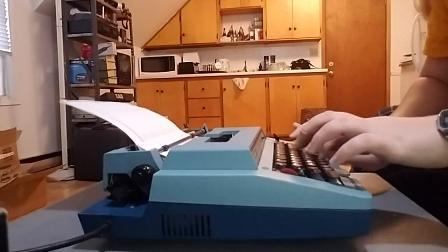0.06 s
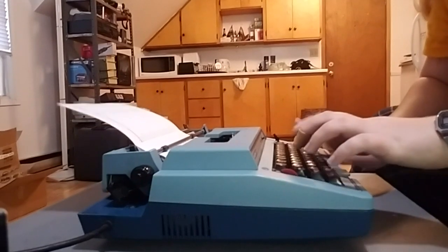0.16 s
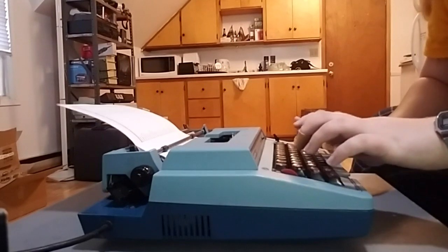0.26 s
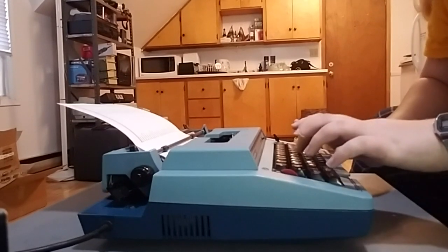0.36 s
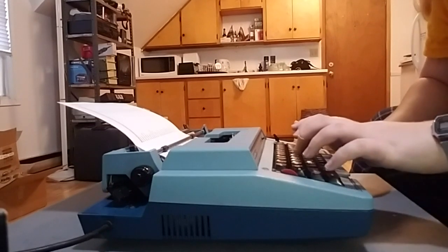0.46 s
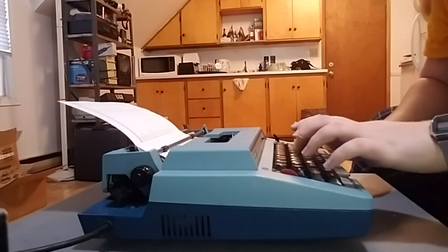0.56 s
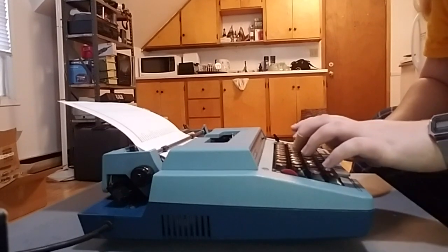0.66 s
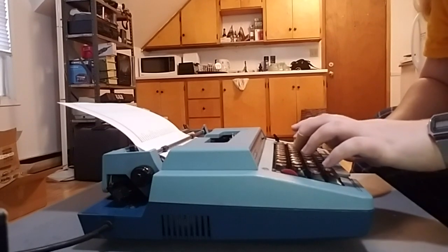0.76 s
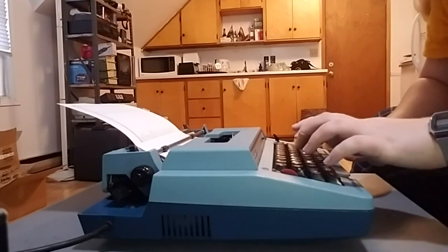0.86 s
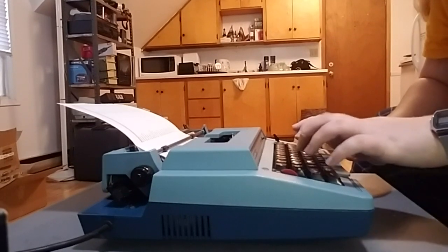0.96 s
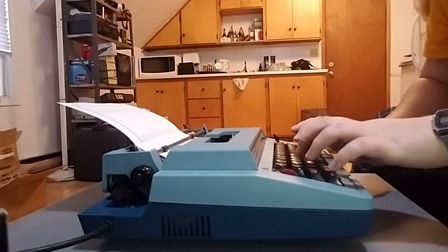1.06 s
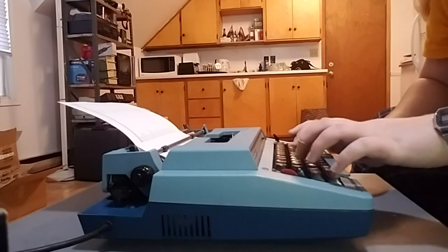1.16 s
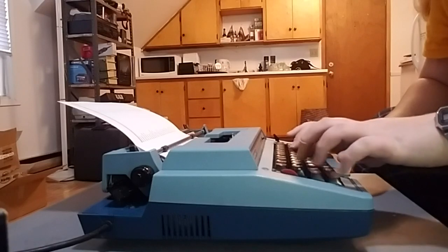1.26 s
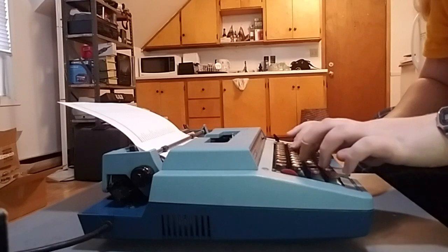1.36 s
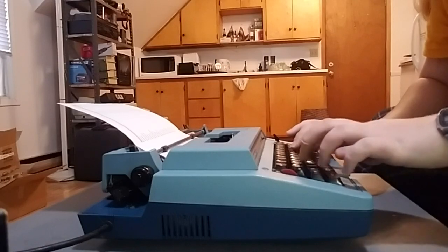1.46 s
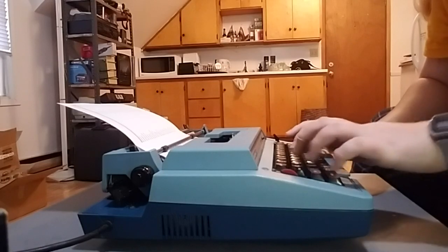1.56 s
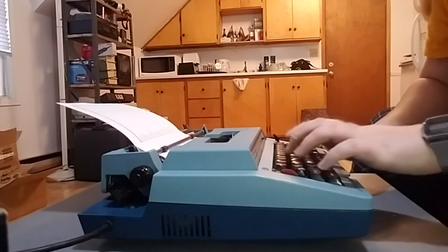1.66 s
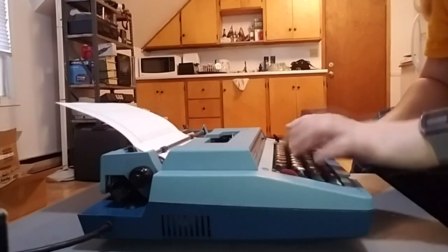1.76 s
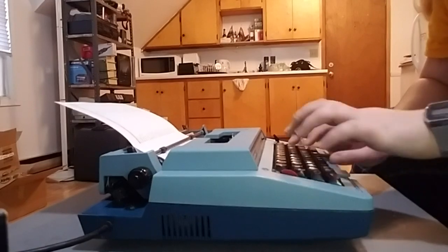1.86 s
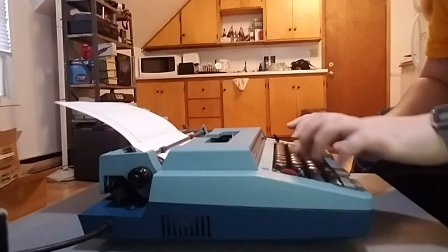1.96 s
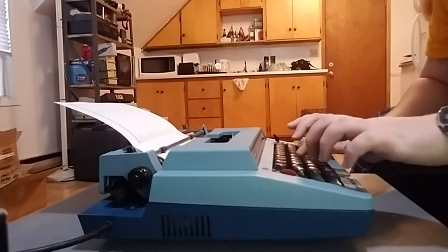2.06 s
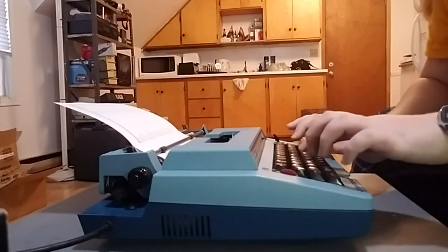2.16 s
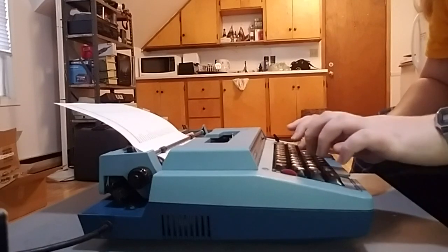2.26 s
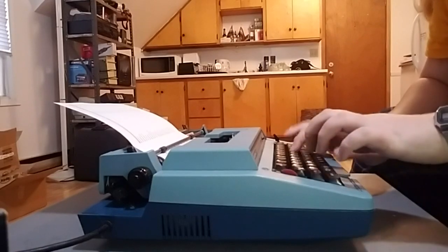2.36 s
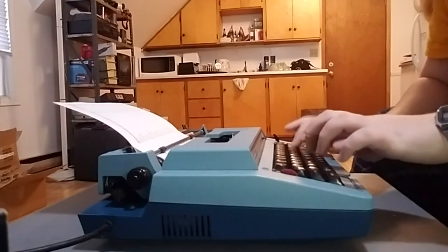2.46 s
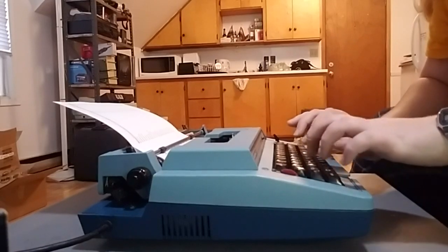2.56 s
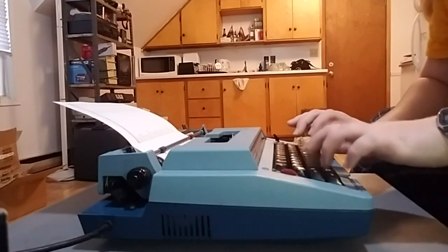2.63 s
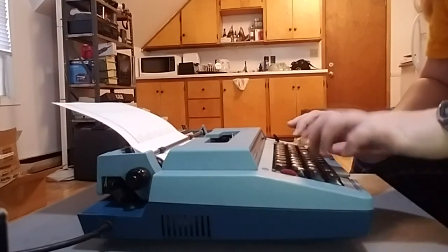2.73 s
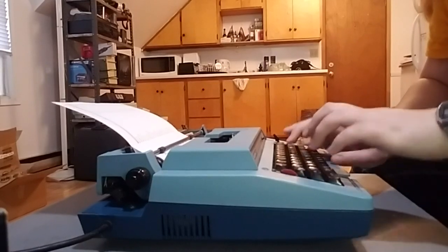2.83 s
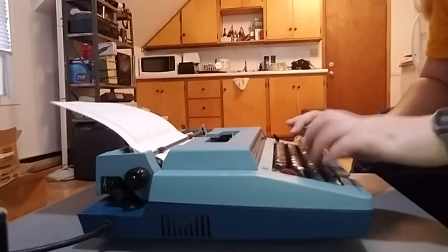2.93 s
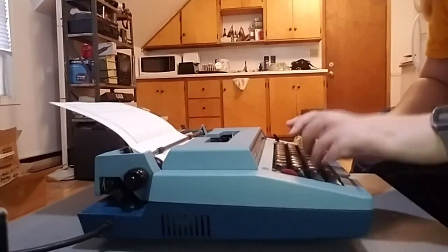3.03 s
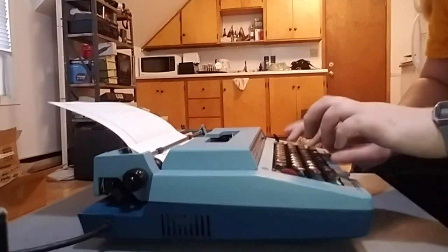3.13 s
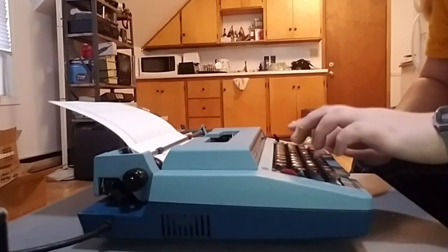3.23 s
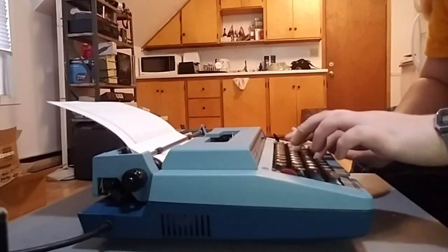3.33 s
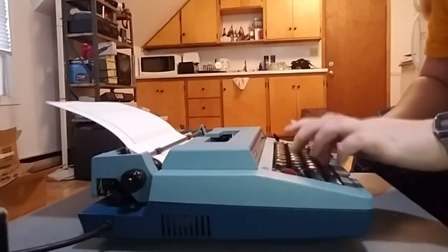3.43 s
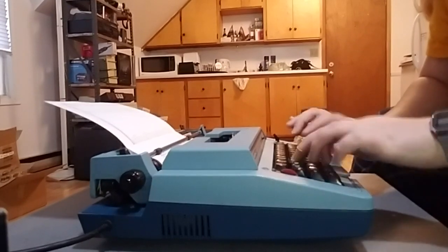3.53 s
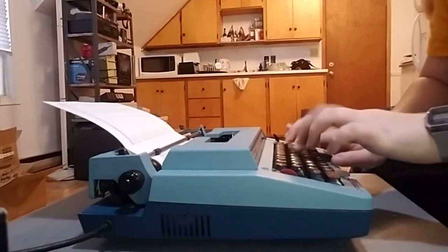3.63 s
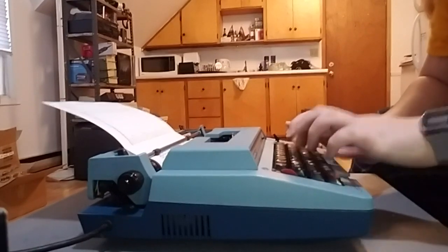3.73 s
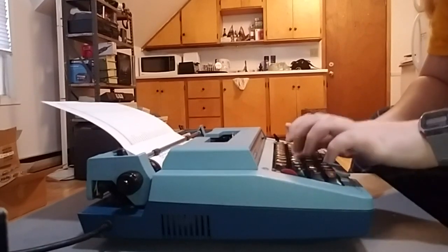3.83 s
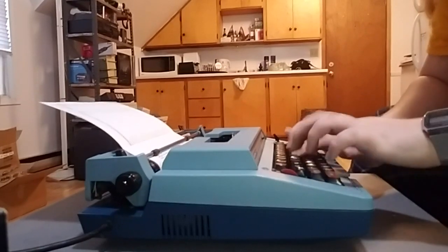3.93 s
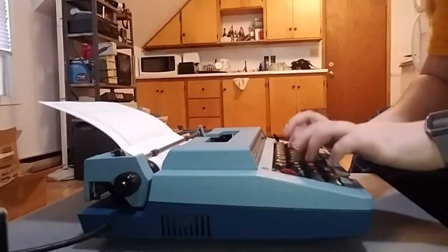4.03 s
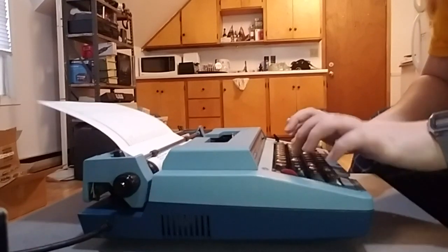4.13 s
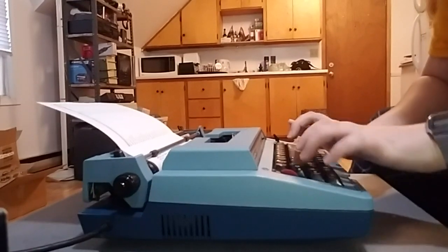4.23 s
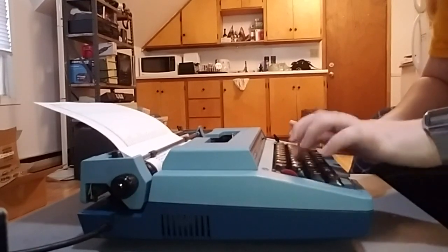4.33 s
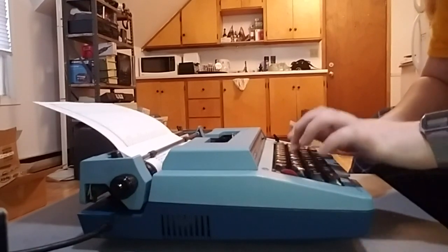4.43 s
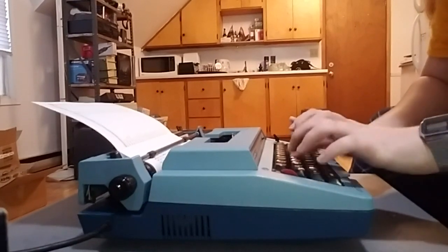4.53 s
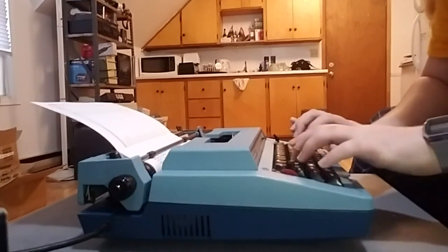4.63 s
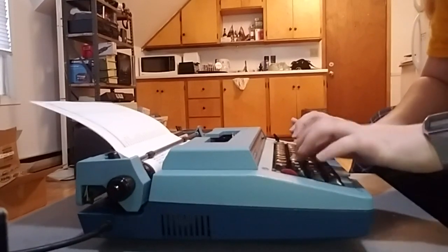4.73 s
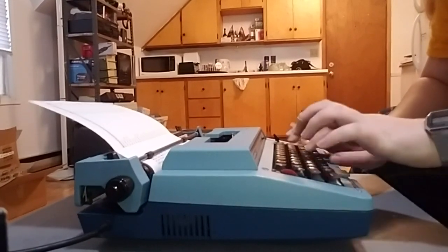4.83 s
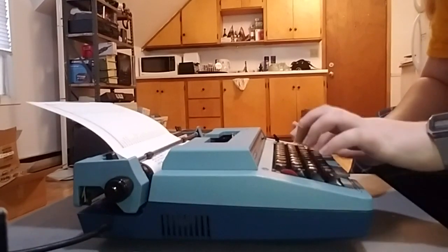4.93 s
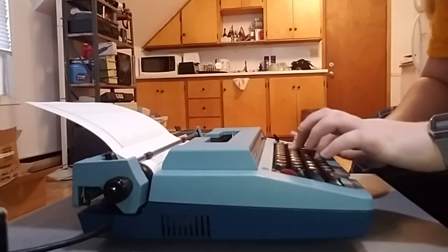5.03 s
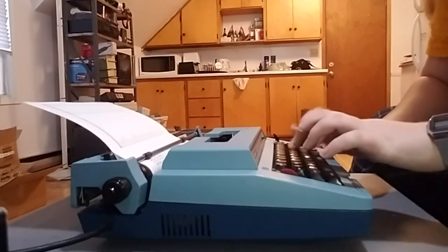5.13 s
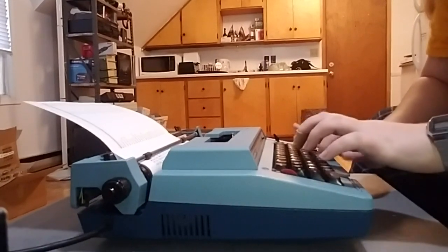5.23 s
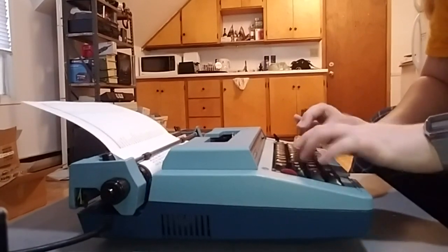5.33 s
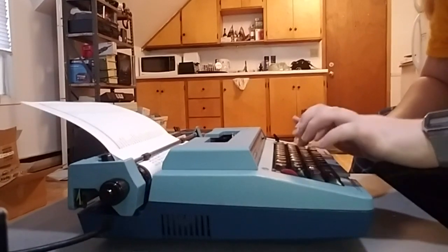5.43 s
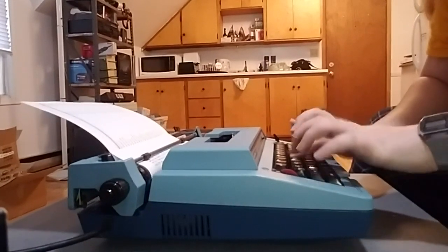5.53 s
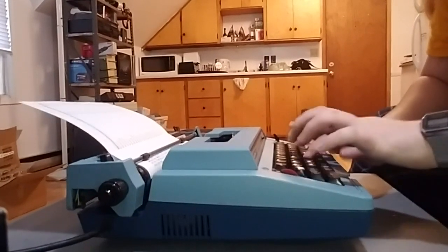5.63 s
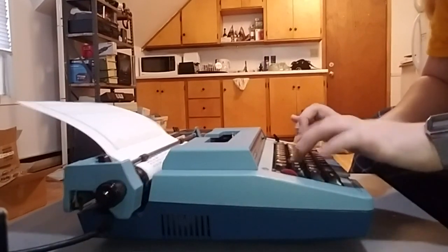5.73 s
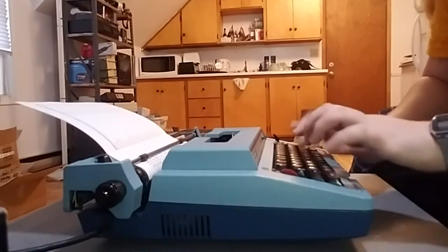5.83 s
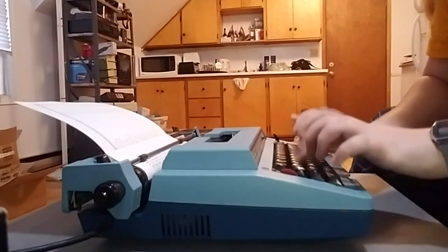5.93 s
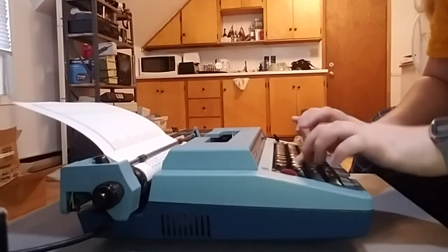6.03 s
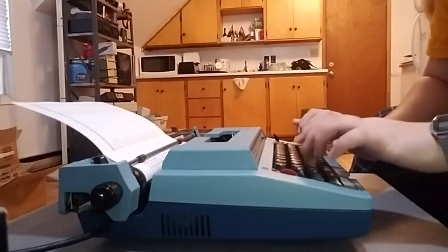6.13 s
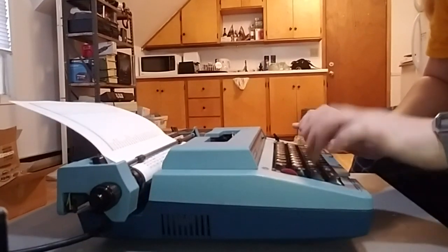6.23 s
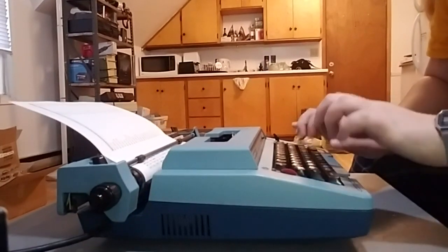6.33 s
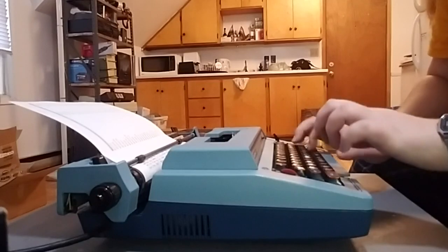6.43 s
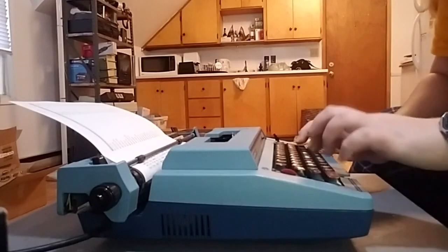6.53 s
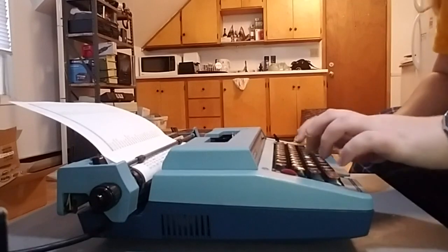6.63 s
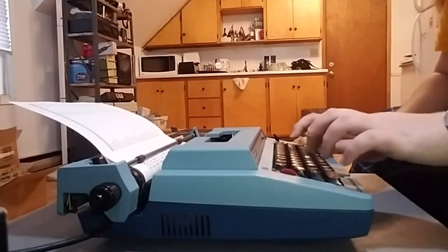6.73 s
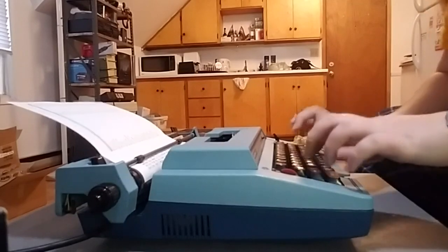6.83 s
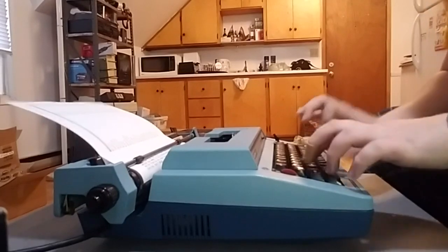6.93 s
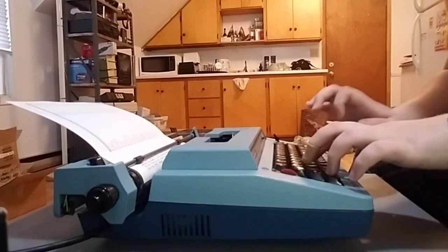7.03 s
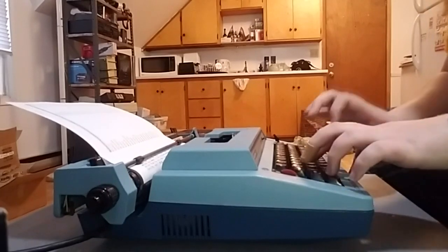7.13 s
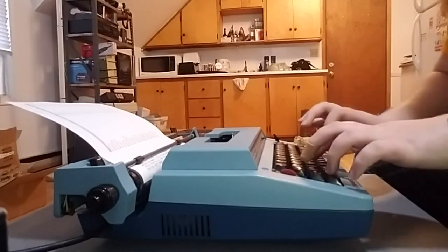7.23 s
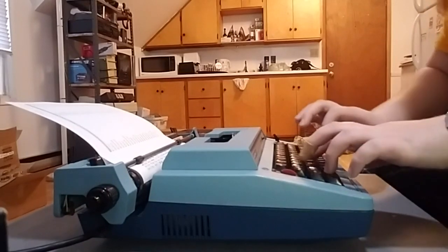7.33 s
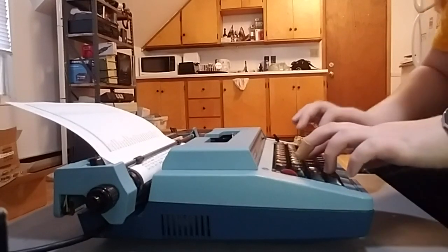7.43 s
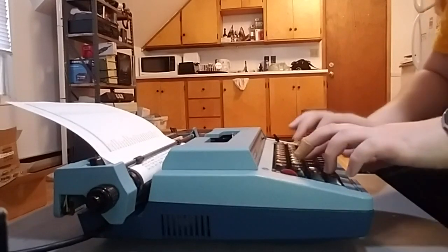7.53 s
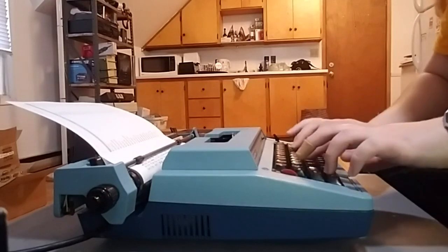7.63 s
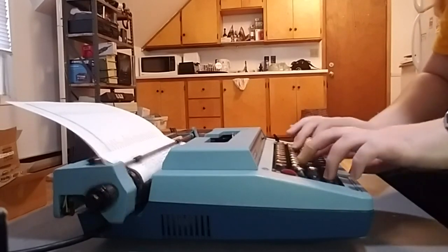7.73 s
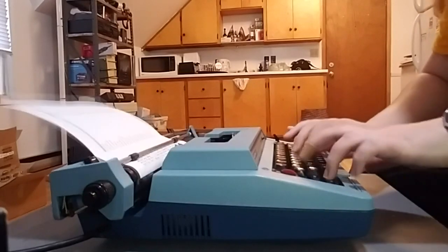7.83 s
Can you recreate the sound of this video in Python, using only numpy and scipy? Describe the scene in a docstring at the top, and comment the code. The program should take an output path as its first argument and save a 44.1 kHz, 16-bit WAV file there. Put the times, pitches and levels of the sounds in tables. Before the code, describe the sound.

An electric typewriter is heard close up in stereo in a small, lively kitchen, its motor giving a steady low hum and soft throbbing whir throughout. A key slaps at 0 s, followed at once by a softer space-bar knock, then only motor until two quick strikes near 1.6 s and a space at 1.75. Single strikes come at 2.3, 2.6 and 2.9 s. From 3.2 to 6.1 s typing is rapid and uneven, roughly seven or eight strikes a second, each a bright steel tick, hard slap, carriage clack and hollow thud with tiny rattles. Brief gaps and duller space knocks break the run. After a pause, a faint ratchety slide and softer strike come around 6.7 s, a space at 6.8, and a muffled low bump at 6.9. Light shift knocks at 7.6 to 7.7 precede a last strike at 7.8. Faint hiss occasionally swells.

```python
"""Electric typewriter in a kitchen

Someone types in quick bursts on an electric typewriter, close to a stereo microphone. Each key trips a linkage
with a bright tick; the type bar slaps the platen and rebounds; the carriage steps on with a clack and the case
thuds. These blows are bursts of dense, fading resonances, and a room tail rings after them. Steady tones and
shaped noise make the motor's hum and whir; a faint band of hiss comes and goes."""
import sys
import numpy as np
from scipy import signal
from scipy.fft import irfft, next_fast_len
from scipy.io import wavfile

SR = 44100
rng = np.random.default_rng(int(sys.argv[2]) if len(sys.argv) > 2 else 0)


def master_out(mix):
    """Clip the mix to full scale and print it as 16-bit PCM to the path in sys.argv[1]."""
    frames = np.transpose(np.atleast_2d(mix))
    ceiling = np.clip(frames, -1, 1)
    pcm = np.round(ceiling * 32767).astype(np.int16)
    wavfile.write(sys.argv[1], SR, pcm)


N = 347949
BAND_HZ = np.geomspace(100, 12800, 8)  # octave centres

# Colour of the bright steel ticks. Each row: frequency in Hz, relative level in dB per Hz.
TICK_COLOUR = [(30, -34.5), (150, -18.5), (500, -12), (1200, -11), (2500, -13.5), (4300, -5), (5000, -11),
               (7500, -9.5), (9300, 4.5), (10700, -3.5), (12500, 3), (16000, -13.5)]
# Colour of the carriage clacks. Each row: frequency in Hz, relative level in dB per Hz.
CLACK_COLOUR = [(30, -27), (120, -17), (400, -3.5), (900, -2.5), (1600, -2), (2200, -5), (4000, -10.5),
                (5000, -23), (10000, -19), (16000, -22.5)]
# Knocks of the shift lifting the type basket. Each row: start in seconds, relative level in dB,
# brightness in dB per octave.
KNOCKS = [(7.6234, -21.5, 3.5), (7.631, -19, -0.5), (7.71, -23.5, -1.5), (7.7207, -21, 4)]


def gain_of(db):
    """Turns decibels into amplitude."""
    return 10 ** (np.asarray(db) / 20)


def evened(x):
    """Scales to an rms (average strength) of 1."""
    return x / np.sqrt(np.mean(x ** 2) + 1e-20)


def read(points, hz):
    """Joins points by straight lines on a log-frequency axis."""
    f, value = np.transpose(points)
    return np.interp(np.log(hz + 1), np.log(f + 1), value)


def add(mix, s, sound):
    """Adds a stereo sound to the mix at time s, cutting off what falls outside."""
    start = round(s * SR)
    sound = sound[:, max(-start, 0):]
    part = mix[:, max(start, 0):][:, :sound.shape[1]]
    part += sound[:, :part.shape[1]]


def case_db(hz):
    """Peaks and dips in dB where the machine's case and frame resonate."""
    # Resonances of the body. Each row: frequency in Hz, width in Hz, height in dB.
    resonances = [(379.5, 48, 4), (502.6, 59, 8.5), (603, 41, -10.5), (730, 38, 4.5), (800, 61, 3),
                  (977, 41, 3), (1108, 100, -4.5), (1336, 30.6, 7.5), (1413, 112, 1), (2050, 280, 1.5),
                  (2690, 59, 2), (3370, 49, 5), (3777, 136, 5), (4300, 37, 8), (6700, 102, 2),
                  (6930, 77, 8), (8900, 327, 2)]
    return sum(db / (1 + (2 * (hz - f) / width) ** 2) for f, width, db in resonances)


def port_pair(hz):
    """Random-phase spectra at two microphone ports: partly alike in the bass, unrelated in the treble."""
    # Likeness of the two channels. Each row: frequency in Hz, coherence from 0 to 1.
    likeness = [(30, 0.4), (130, 0.86), (330, 0.54), (480, 1), (610, 0.45), (750, 0.97), (1000, 0.53),
                (1400, 0.56), (1800, 0.33), (2300, 0), (4000, 0)]
    # How far the left channel leads. Each row: frequency in Hz, phase in radians.
    left_lead = [(30, 0.33), (250, 0.146), (550, 0.71), (950, 0.31), (1150, 1.77), (1600, 3), (2200, 1.06),
                 (5000, 0.98)]
    a, b = np.exp(2j * np.pi * rng.random((2, len(hz))))
    same = read(likeness, hz)
    right = (same * a + np.sqrt(1 - same ** 2) * b) * np.exp(-1j * read(left_lead, hz))
    return np.array([a, right])


def lean(hz):
    """Left and right gains for the machine's place."""
    # Balance of the two sides. Each row: frequency in Hz, left minus right in dB.
    balance = [(60, -6), (110, 1), (200, -3.5), (380, 0), (700, -1), (1290, -2.5), (2380, 1.5), (4400, 1),
               (8000, 0.6), (15000, 2.5)]
    return gain_of(np.outer([.5, -.5], read(balance, hz)))


def octaves(hz):
    """Overlapping octave windows that sum to one."""
    return np.array([read(np.c_[BAND_HZ, row], hz) for row in np.eye(len(BAND_HZ))])


def wander(per_s):
    """Random drift of rms 1, made of sines up to per_s cycles a second."""
    t = np.arange(0, N + 512, 512) / SR
    rates = np.geomspace(per_s / 10, per_s, 20)
    drift = sum(np.sin(2 * np.pi * (f * t + rng.random())) / np.sqrt(f) for f in rates)
    return np.interp(np.arange(N) / SR, t, evened(drift))


def motor(shaft_hz=56.8, throb=0.17, waver=0.00088, body=0.33, hum_lean_db=-1.5):
    """Steady hum tones, and the whir of belt and roll that throbs with the shaft and rings in the case."""
    # Mains hum and motor tones. Each row: frequency in Hz, level in dB before the stereo tilt.
    hum_tones = [(58.8, -74.5), (119.95, -54), (179.5, -75.5), (239.9, -76.5), (307, -70.5), (359.5, -77),
                 (421.8, -70.5), (475, -68.5), (773, -69.5), (1167, -77.5), (1228, -72.5), (1287.5, -82.5),
                 (1405, -80), (1600, -77)]
    # Colour of the whir of motor, belt and power roll. Each row: frequency in Hz, relative level in dB per Hz.
    whir_colour = [(20, -3), (40, -3.5), (75, -10), (130, -5), (200, -3.5), (330, -3), (500, 2),
                   (650, -1.5), (800, -1.5), (1100, -4), (2300, -9.5), (2900, -15), (3900, -18.5),
                   (4900, -27), (8000, -31.5), (16000, -23)]
    # Level of the whir as typing loads it, before its flutter. Each row: time in seconds, level in dB.
    whir_level = [(0, -54), (1.4, -57), (2.1, -53.5), (6.5, -55), (7.1, -54), (7.9, -58.5)]
    t, hz = np.arange(N) / SR, np.fft.rfftfreq(next_fast_len(N), 1 / SR)
    drift = waver * wander(6)
    hum = 0
    for f, db in hum_tones:
        phase = f * (2 * np.pi * t + drift) + 2 * np.pi * rng.random()
        hum = hum + gain_of(db) * np.sqrt(2) * np.sin(phase)
    colour = gain_of(read(whir_colour, hz) + body * case_db(hz))
    whir = evened(irfft(port_pair(hz) * lean(hz) * colour)[:, :N])
    flutter_db = 0.71 * wander(24)
    whir *= gain_of(np.interp(t, *np.transpose(whir_level)) + flutter_db)
    whir *= 1 + throb * np.sin(2 * np.pi * shaft_hz * t)
    return whir + hum * gain_of([[hum_lean_db], [-hum_lean_db]])


def hiss(centre_hz=3700, width_hz=330):
    """A narrow band of noise that swells and fades."""
    # Level of the faint, airy hiss. Each row: time in seconds, level in dB.
    hiss_level = [(0, -70), (0.35, -66), (0.8, -88), (1.5, -84), (2.1, -67), (2.5, -78), (6.5, -88),
                  (6.9, -71), (7.15, -72), (7.4, -88)]
    hz = np.fft.rfftfreq(next_fast_len(N), 1 / SR)
    window = np.exp(-.5 * ((hz - centre_hz) / width_hz) ** 2)
    band = evened(irfft(port_pair(hz) * window)[:, :N])
    return band * gain_of(np.interp(np.arange(N) / SR, *np.transpose(hiss_level)))


def typing(step_s=.054):
    """The main moments of the machine's cycle, as rows: seconds, relative dB, brightness in dB per octave."""
    # Letter keys. Each row: strike in seconds, strike level in dB, strike brightness in dB per octave,
    # seconds from trip to strike, trip level in dB, trip brightness in dB per octave, carriage stop level
    # in dB. All levels are relative.
    keys = [(0.0014, -13.5, -1, 0.028, -6, -7.5, -26), (1.5665, -9.5, 0, 0.034, -19.5, -5, -15),
            (1.6774, -9.5, 0, 0.032, -17.5, -1.5, -12.5), (2.3238, -8, 0, 0.029, -10.5, -2, -21),
            (2.6074, -8.5, 0, 0.039, -15, -3.5, -19), (2.9249, -7.5, -1, 0.029, -17, -5, -15.5),
            (3.2177, -7.5, 0.5, 0.034, -16.5, -1.5, -12.5), (3.2939, -8.5, -0.5, 0.042, -19, -9.5, -21),
            (3.392, -9, 0, 0.018, -25, 2, -13), (3.468, -9, 0.5, 0.034, -12.5, -4, -15),
            (3.7347, -8, 0.5, .0317, -13, -3.5, -14.5), (3.8086, -6.5, 1, 0.029, -29, -8.5, -19.5),
            (3.9103, -7.5, 1.5, 0.04, -16, -3.5, -16), (3.9605, -9, -0.5, .035, -24, -10, -16),
            (4.1807, -7.5, 0.5, 0.059, -14, -4.5, -12.5), (4.2177, -9.5, -0.5, 0.04, -14, -2, -21.5),
            (4.355, -8, 0, 0.055, -9, -4, -13.5), (4.4516, -8, 0.5, 0.044, -16, -3.5, -12.5),
            (4.589, -8, 0, 0.039, -9, 0, -11), (4.6623, -8, 0.5, .0388, -6, 3.5, -17),
            (4.9424, -7.5, 1, 0.045, -22, 2, -29.5), (4.996, -9.5, 0, 0.029, -23, -2.5, -17),
            (5.1647, -6, 1, .0339, -14.5, 1, -16.5), (5.2664, -9.5, 0, .0285, -6.5, 1.5, -16),
            (5.4855, -10, 0.5, 0.029, -13, -3.5, -13.5), (5.572, -7.5, 1, 0.042, -12, -5.5, -18.5),
            (5.6488, -8.5, 0, 0.036, -8, -5, -13), (5.8328, -10, 0, 0.052, -14, -5.5, -12.5),
            (5.9312, -9.5, 0.5, 0.05, -9, 0, -15), (6.007, -8, 1, 0.04, -15, 4, -12),
            (6.13, -9.5, 0.5, 0.038, -21.5, -5, -14.5), (6.7151, -12, -1.5, 0.038, -35, -8.5, -19.5),
            (7.7929, -9.5, 1, .0454, -12, -1, -14)]
    # Space bar. Each row: start in seconds, relative level in dB, seconds until the carriage stops,
    # relative level of that stop in dB.
    space_bar = [(0.067, -19.5, .035, -27), (1.7496, -19, .069, -16.5), (2.749, -16.5, .056, -18),
                 (3.01, -16, 0.065, -17), (3.556, -17.5, 0.055, -17.5), (4.766, -19.5, 0.052, -15),
                 (6.797, -20.5, .066, -19.5)]
    trips = [(s - lead, db, brightness) for s, _, _, lead, db, brightness, _ in keys]
    strikes = [key[:3] for key in keys]
    spaces = [(s, db, 0) for s, db, _, _ in space_bar]
    # after a strike, the carriage stops one letter on
    stops = [(s + step_s, db, 0) for s, *_, db in keys]
    stops += [(s + step, db, 0) for s, _, step, db in space_bar]
    return trips, strikes, spaces, stops


def after(causes, delay_s, db, brightness, play_s=0):
    """The blows that a list of causes sets off (before it if the delay is negative); play_s varies the delay."""
    rows = np.array(causes) + [delay_s, db, brightness]
    rows[:, 0] += play_s * rng.standard_normal(len(rows))
    return rows


def ringer(colour, bass_t60, treble_t60, rise_cycles, alike, patchy_db=2, size=4096, count=60):
    """Returns a striker for one part: dense resonances; the t60s are the seconds to fall by 60 dB."""
    hz, t = np.fft.rfftfreq(size, 1 / SR), np.arange(size) / SR
    t60 = np.geomspace(bass_t60, treble_t60, len(BAND_HZ))[:, None]
    rise = np.minimum(rise_cycles / BAND_HZ, .003)[:, None] + 0.00079  # the bass swells more slowly
    fade = (1 - np.exp(-t / rise)) * gain_of(-60 * t / t60)
    fade /= np.sqrt(np.mean(fade ** 2, 1, keepdims=True))
    shape = evened(gain_of(read(colour, hz) + case_db(hz))) * lean(hz)
    bands, own = octaves(hz)[:, None], port_pair(hz)
    centre_hz = np.exp(np.average(np.log(hz + 1), weights=shape[0] ** 2))
    height = np.log2(np.clip(hz, 150, None) / centre_hz)  # octaves above the part's centre
    height = np.clip(height, -3, 3)

    def strike(db, brightness):
        """One blow: partly the part's own ring, partly new; each contact favours other resonances."""
        place = np.linspace(0, 1, count)
        favoured = np.interp(np.sqrt(hz / hz[-1]), place, rng.standard_normal(count))
        spectrum = (np.sqrt(alike) * own + np.sqrt(1 - alike) * port_pair(hz)) * shape
        spectrum *= gain_of(brightness * height) * evened(gain_of(patchy_db * favoured))
        return gain_of(db) * np.sqrt(size) * (irfft(bands * spectrum) * fade[:, None]).sum(0)
    return strike


def blows(rows, strike, level_db):
    """Plays a table of blows on one part."""
    out = np.zeros((2, N))
    for s, db, brightness in rows:
        add(out, s, strike(db + level_db, brightness))
    return out


def levers(trips, level_db=-15, size=4096):
    """Every linkage pings as it trips; pitch and the balance of the tones differ from ping to ping."""
    # A steel key lever ringing. Each row: typical frequency in Hz, relative level in dB,
    # seconds to fall by 60 dB.
    lever_tones = [(4140, -9, 0.024), (4200, -1, 0.022), (7060, -12.5, 0.019), (9580, -9.5, 0.017),
                   (12000, -8.5, .02)]
    out, t = np.zeros((2, N)), np.arange(size) / SR
    hz, tone_db, t60 = np.transpose(lever_tones)[:, :, None]
    for s, db, brightness in trips:
        pitch = hz * (1 + .015 * rng.standard_normal(hz.shape))
        favoured_db = 4 * rng.standard_normal(hz.shape)
        size_db = db + level_db + tone_db + favoured_db + brightness * np.log2(hz / hz.mean())
        tones = np.sin(2 * np.pi * (pitch * t + rng.random((2, len(hz), 1))))
        ring = gain_of(size_db - 60 * t / t60) * tones
        add(out, s, ring.sum(1) * (1 - np.exp(-t / 0.0011)))
    return out


def linkages(trips, strikes):
    """Steel ticks: the finger lands, the linkage trips and resets, and the type bar drops back on its rest."""
    tick = ringer(TICK_COLOUR, bass_t60=0.096, treble_t60=0.023, rise_cycles=.8, alike=0.36, patchy_db=4.5)
    touches = after(trips, delay_s=-.008, db=-22.5, brightness=1.5)
    resets = after(trips, delay_s=0.017, db=-13.5, brightness=-0.45, play_s=0.0018)
    drops = after(strikes, delay_s=0.12, db=-20.5, brightness=-1.5, play_s=0.002)
    ticks = blows([*trips, *touches, *resets, *drops], tick, level_db=-25.0)
    return ticks + levers(trips) + slides()


def shoves(thuds, level_db=-4, pitch_hz=640, t60=0.0081, lag_s=.00015):
    """Each thud starts with a shove on the side panel: a few quickly damped cycles, the right side later."""
    out = np.zeros((2, N))
    t = np.maximum(np.arange(2048) / SR - np.array([[0], [lag_s]]), 0)
    for (s, db, _), sign in zip(thuds, rng.choice([-1, 1], len(thuds))):
        swell = (1 - np.exp(-t * pitch_hz)) * gain_of(db + level_db - 60 * t / t60)
        add(out, s, sign * swell * np.sin(2 * np.pi * pitch_hz * t))
    return out


def case(strikes, spaces, stops):
    """The case thuds as the cam grips, as the carriage starts and stops, as it settles, and at other knocks."""
    # Colour of the thuds. Each row: frequency in Hz, relative level in dB per Hz.
    thud_colour = [(20, -31), (45, -11.5), (80, -14), (140, 0.5), (200, -9), (480, -2.5), (800, -3.5),
                   (1200, -12), (2500, -20.5), (8000, -48)]
    thud = ringer(thud_colour, bass_t60=0.1, treble_t60=0.014, rise_cycles=1.7, alike=.15, patchy_db=1.5)
    grips = after(strikes, delay_s=-.02, db=-17, brightness=-1.5, play_s=.0015)
    starts = after(strikes, delay_s=.042, db=-11.5, brightness=0.22, play_s=0.00199)
    halts = after(stops, delay_s=0, db=1.5, brightness=2.8)
    settles = after(stops, delay_s=.052, db=-13.5, brightness=-2.8, play_s=.003)
    thuds = [*grips, *starts, *halts, *settles, *spaces, *KNOCKS]
    return blows(thuds, thud, level_db=-20.0) + shoves(thuds)


def swings(strikes, level_db=-49, brightness=0.57, lead_s=0.017, spread_s=0.0079, count=3):
    """Just before each strike the power roll grabs a cam and flings the type bar, which scrapes in its slot."""
    out = np.zeros((2, N))
    scrape = ringer(CLACK_COLOUR, bass_t60=.05, treble_t60=0.096, rise_cycles=1.5, alike=0.12)
    for (s, *_), draws in zip(strikes, rng.random((len(strikes), count))):
        for late in draws:
            add(out, s - lead_s + spread_s * late, scrape(level_db, brightness))
    return out


def type_bars(strikes, level_db=-18.5, rebound_s=.0096, rebound_db=-24.5, uneven_db=1.5):
    """The raised letter slaps the paper on the platen, and the bar knocks again as it rebounds."""
    # Colour of the strikes. Each row: frequency in Hz, relative level in dB per Hz.
    strike_colour = [(30, -14.5), (150, -17.5), (280, -6.5), (450, -7.5), (900, 0.5), (1400, -1.5),
                     (2600, -6.5), (4200, -6), (4900, -12.5), (7000, -14), (7900, -16), (9300, -11),
                     (13000, -12.5), (16000, -22)]
    out = np.zeros((2, N))
    slap = ringer(strike_colour, bass_t60=0.076, treble_t60=0.029, rise_cycles=1.7, alike=0.25)
    knock = ringer(strike_colour, bass_t60=0.087, treble_t60=0.035, rise_cycles=1.0, alike=0.13)
    for (s, db, brightness), (late, hard) in zip(strikes, rng.standard_normal((len(strikes), 2))):
        add(out, s, slap(db + level_db, brightness))
        knock_db = db + rebound_db + uneven_db * hard
        add(out, s + rebound_s + .0007 * late, knock(knock_db, brightness))
    return out


def rattle(clacks, level_db=-33, spread_s=.045, fall_db=5, count=4):
    """Loose levers chatter a few times after each clack, more softly the later they come."""
    out = np.zeros((2, N))
    chatter = ringer(CLACK_COLOUR, bass_t60=.05, treble_t60=0.025, rise_cycles=0.67, alike=0.099)
    for (s, db, brightness), draws in zip(clacks, rng.random((len(clacks), count, 2))):
        for late, hard in draws:
            chatter_db = db + level_db - fall_db * late + 6 * (hard - .5)
            add(out, s + spread_s * late, chatter(chatter_db, brightness))
    return out


def escapement(strikes, spaces, stops):
    """Clacks: a strike or the space bar frees the carriage, and the next tooth catches it; the shift knocks."""
    clack = ringer(CLACK_COLOUR, bass_t60=0.067, treble_t60=0.0292, rise_cycles=0.95, alike=0.54, patchy_db=3.0)
    releases = after(strikes, delay_s=.044, db=-15, brightness=-.5, play_s=.002)
    catches = after(stops, delay_s=0.00102, db=-8.5, brightness=-0.48, play_s=.001)
    clacks = [*spaces, *catches, *KNOCKS]
    return blows([*clacks, *releases], clack, level_db=-22.0) + rattle(clacks) + swings(strikes)


def room(x, build_s=0.001, first_s=0.0049, size=32768):
    """The kitchen's tail builds up over a few ms; each octave dies at its own speed."""
    # How long the room rings. Each row: frequency in Hz, seconds to fall by 60 dB.
    ring_time = [(100, 0.69), (300, 0.41), (800, 0.46), (2000, 0.49), (5000, 0.41), (13000, 0.33)]
    # Colour of the room. Each row: frequency in Hz, relative level in dB.
    room_colour = [(50, 5), (250, 1.5), (700, -6.5), (1400, -0.5), (3000, -1.5), (6000, 1), (12000, -1.5),
                   (16000, 1)]
    hz, t = np.fft.rfftfreq(size, 1 / SR), np.arange(size) / SR
    build = 1 - np.exp(-np.maximum(t - first_s, 0) / build_s)
    fade = build * gain_of(-60 * t / read(ring_time, BAND_HZ)[:, None])
    fade /= np.sqrt(np.mean(fade ** 2, 1, keepdims=True))
    bands = octaves(hz)[:, None] * gain_of(read(room_colour, hz)) * lean(hz)
    out = 0
    for side in x:
        tail = (irfft(bands * port_pair(hz)) * fade[:, None]).sum(0)
        out = out + signal.oaconvolve(side[None], tail, axes=1)[:, :N] / np.sqrt(2)
    return out


def slides(level_db=-41, count=14):
    """A heavy linkage slides along its guide in a run of tiny steel catches."""
    # Slides of the linkage. Each row: start in seconds, length in seconds, relative level in dB.
    runs = [(6.657, 0.039, -28), (6.69, .022, -27), (6.73, 0.085, -15.5), (7.619, 0.018, -22)]
    out = np.zeros((2, N))
    catch = ringer(TICK_COLOUR, bass_t60=0.042, treble_t60=.025, rise_cycles=.8, alike=0.11)
    for start, length, db in runs:
        for along in (np.arange(count) + rng.random(count)) / count:
            add(out, start + length * along, catch(db + level_db, 0))
    return out


def basket_drop(start_s=6.921, level_db=-21, pitch_hz=185, t60=0.028, rise_s=0.0027):
    """The shifted type basket sinks back on its rubber stops: a compact, low, damped tone with no click."""
    t = np.arange(4096) / SR
    out = np.zeros((2, N))
    swell = (1 - np.exp(-t / rise_s)) * gain_of(level_db - 60 * t / t60)
    bump = swell * np.sin(2 * np.pi * pitch_hz * t)
    add(out, start_s, np.array([bump, bump]))
    return out


def scene():
    """Mixes all the parts; the clacks are sent to the room with the most gain, the thuds with the least."""
    trips, strikes, spaces, stops = typing()
    slaps, ticks = type_bars(strikes), linkages(trips, strikes)
    clacks, thuds = escapement(strikes, spaces, stops), case(strikes, spaces, stops)
    # three separate room tails; ticks and thuds share one
    wet = room(gain_of(-0.17) * slaps)
    wet = wet + room(gain_of(-2.5) * ticks + gain_of(-4.0) * thuds)
    wet = wet + room(gain_of(4.0) * clacks)
    return slaps + ticks + clacks + thuds + basket_drop() + wet + motor() + hiss()


def record(dry, low_cut_hz=50, edge_hz=16100):
    """The microphone thins the deepest bass; then a steep filter removes the highest treble."""
    thinned = signal.lfilter(*signal.butter(1, low_cut_hz, "high", fs=SR), dry)
    treble_cut = signal.firwin(511, edge_hz, window=("kaiser", 9), fs=SR)
    return signal.oaconvolve(thinned, treble_cut[None], "same")


dry = scene()
out = record(dry)
master_out(out)
```